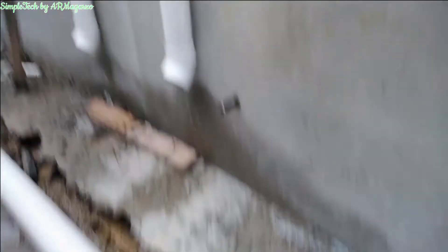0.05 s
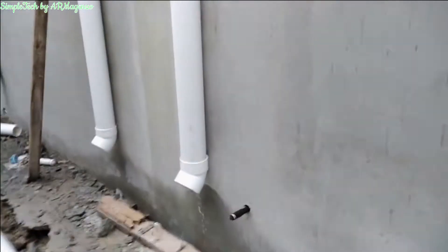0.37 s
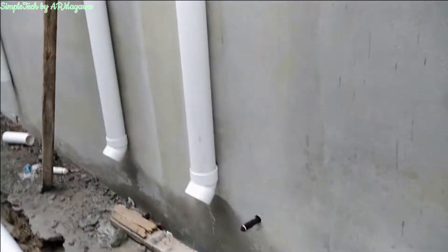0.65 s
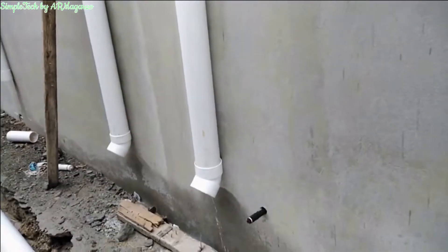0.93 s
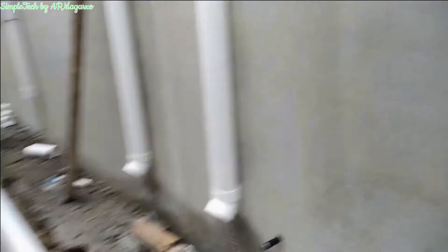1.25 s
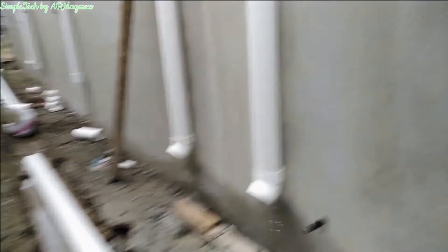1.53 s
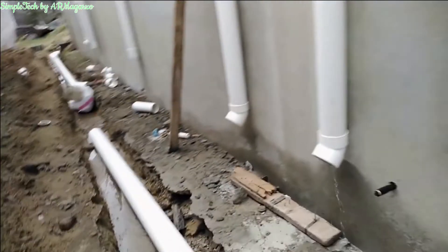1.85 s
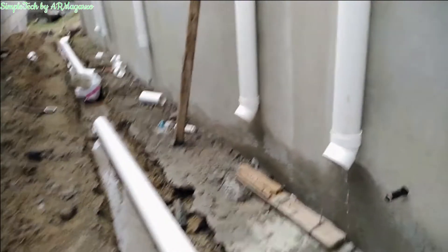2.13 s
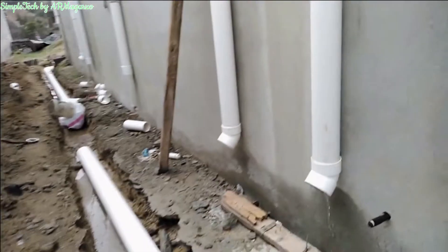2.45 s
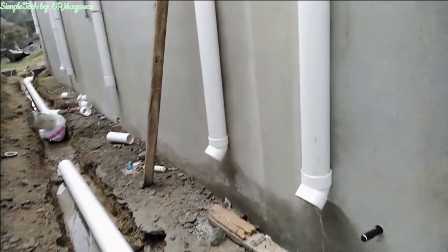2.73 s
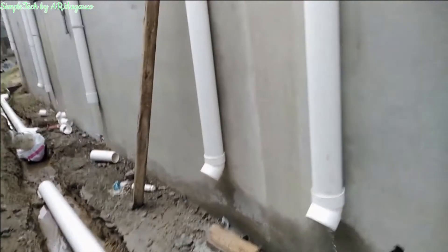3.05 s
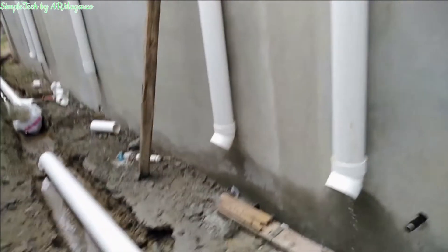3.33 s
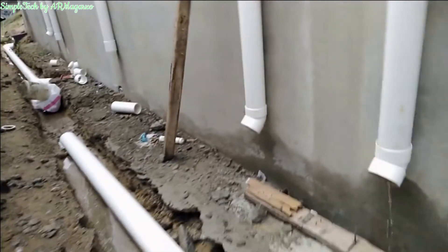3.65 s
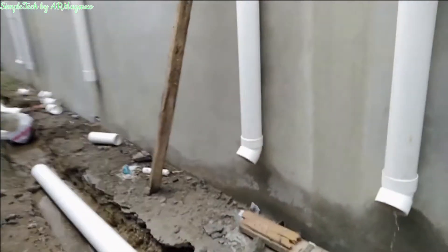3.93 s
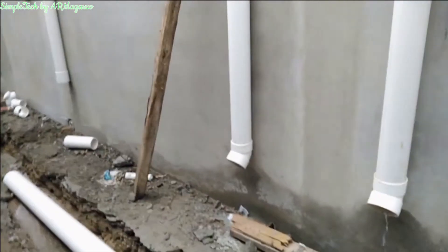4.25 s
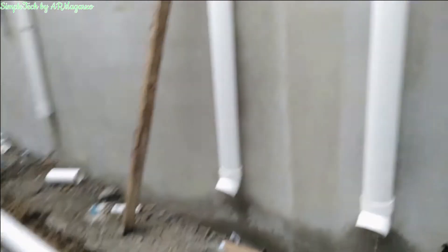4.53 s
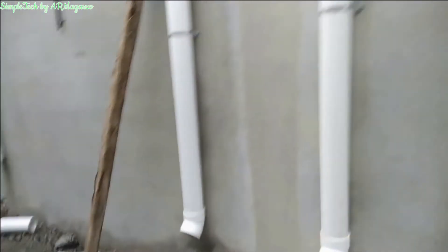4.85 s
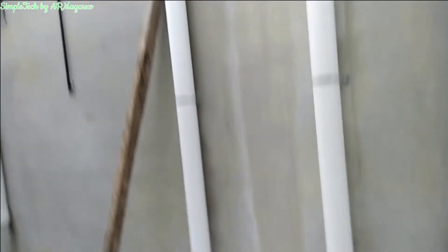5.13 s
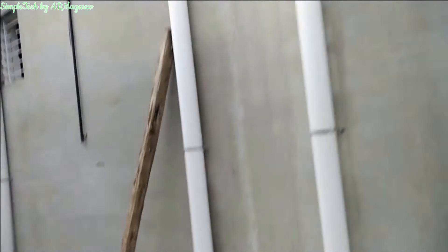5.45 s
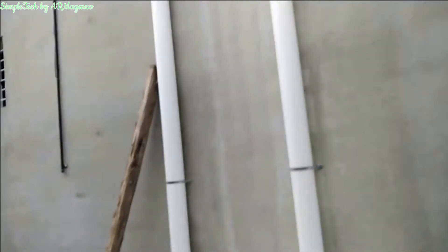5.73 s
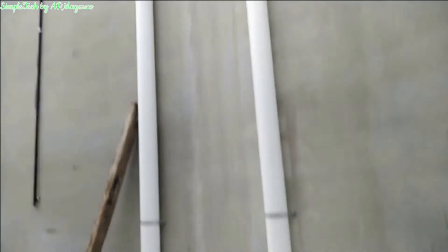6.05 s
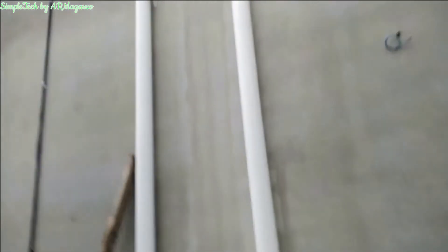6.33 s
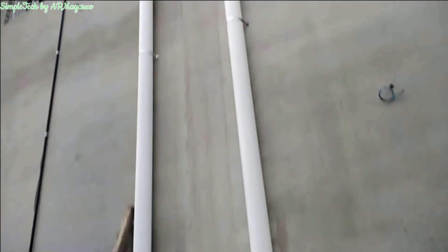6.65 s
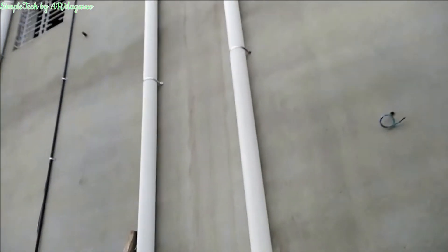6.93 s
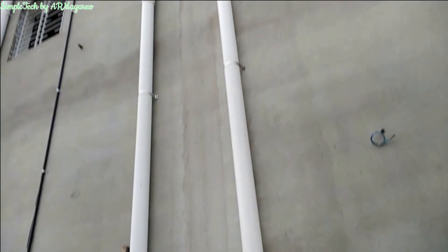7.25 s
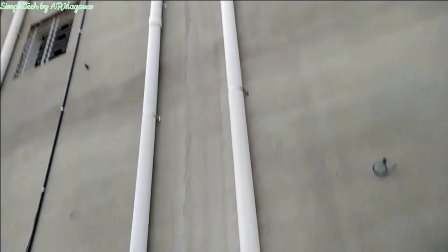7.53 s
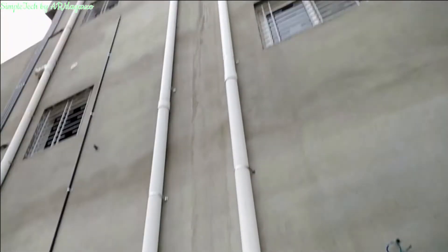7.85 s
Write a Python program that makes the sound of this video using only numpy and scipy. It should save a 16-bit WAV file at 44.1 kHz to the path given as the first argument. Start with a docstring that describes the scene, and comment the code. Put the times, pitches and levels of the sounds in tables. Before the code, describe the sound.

Rainwater drips from downpipes onto concrete and puddles close by, while soft steps scuff wet grit over a low rumble.

```python
"""Rainwater drips from downpipes onto wet concrete, mud and puddles, close to a hand-held camera.
Each drop is a damped ring with a wet crack: small ones tick, fat ones splat, dull ones plop, and trapped
bubbles sing. Behind them sit a fine spatter, steps scuffing wet grit, one heel thud, soft handling bumps
and a low rumble. The house wall gives each drop a short answer; the top end leans well to the left."""
import sys
import numpy as np
from scipy import signal
from scipy.fft import rfft, irfft, next_fast_len
from scipy.io import wavfile
from scipy.ndimage import uniform_filter1d, map_coordinates

SR = 44100
rng = np.random.default_rng(int(sys.argv[2]) if len(sys.argv) > 2 else 0)


def bounce(signal):
    """Save signal as a 16-bit WAV file at the path given by the first command-line argument."""
    frames = np.transpose(np.atleast_2d(signal))
    limited = np.clip(frames, -1, 1)
    pcm = np.round(limited * 32767).astype(np.int16)
    wavfile.write(sys.argv[1], SR, pcm)


N = 347508

# fader ride of the outdoor rumble: (time [s], level [dB])
RUMBLE_RIDE = [(0.0, -49), (2.43, -56.5), (3.03, -54), (3.95, -60), (4.21, -51.5), (4.87, -56.5),
               (5.48, -51), (5.66, -53), (6.7, -52.5), (7.4, -58.5)]
# rumble EQ: (frequency [Hz], gain [dB])
RUMBLE_EQ = [(38, -22.5), (62, -3), (100, 1), (230, 1.5), (330, -4), (450, -15.5), (700, -33.5),
             (1200, -41), (3000, -68)]
# hollow swells in the rumble: (crest time [s], level [dB], pitch [Hz], half length [s])
RUMBLE_SWELLS = [(5.282, -44.5, 277.5, 0.042), (5.478, -44.5, 265, 0.085), (6.485, -48, 256.5, 0.036),
                 (6.666, -49.5, 203.2, 0.14), (7.062, -46, 165, 0.1)]
# the hand knocking the camera: (time [s], level [dB], pitch [Hz])
HAND_BUMPS = [(2.816, -41, 102), (3.106, -35, 175), (3.124, -31, 263)]
# steps on wet grit: (time [s], crunch level [dB], spatter level [dB], rise [s], hold [s], fall [dB/s])
FOOTSTEPS = [(0.338, -57.5, -47, 0.14, 0.024, 115), (0.937, -64, -77, 0.098, 0.02, 152),
             (2.004, -57, -47.5, 0.014, 0.075, 99), (2.951, -55.5, -49, 0.0067, 0.06, 89),
             (3.935, -53.5, -47.5, 0.04, 0.26, 34.5), (4.564, -59.5, -53, 0.0077, 0.011, 149),
             (4.823, -56, -55, 0.03, 0.13, 27.5), (5.224, -61, -53, 0.08, 0.18, 109),
             (6.727, -68, -53, 0.026, 0.07, 113)]
# scrape lingering after a step: (time [s], level [dB], rise [s], hold [s], fall [dB/s])
SCRAPES = [(3.12, -61.5, 0.016, 0.1, 44)]
# the sole biting into grit: (time [s], level [dB])
HEEL_BITES = [(2.02, -46.5), (2.97, -43.5), (3.975, -45.5), (4.915, -48), (4.933, -44.5), (6.819, -49.5)]
# heel bite EQ: (frequency [Hz], gain [dB])
HEEL_EQ = [(250, -16), (550, -2), (2300, 0), (4000, -15), (12000, -35)]
# crushed grit EQ: (frequency [Hz], gain [dB])
GRIT_EQ = [(200, -20), (420, 3), (700, -27), (1100, -42), (1400, -6), (2100, 7), (3600, -2.5), (5000, 1),
           (7800, -1), (11000, -49)]
# squeezed mud EQ: (frequency [Hz], gain [dB])
MUD_EQ = [(250, -20), (600, 1.5), (1100, -4.5), (1800, 9.0), (3500, -15.5)]
# fader ride of the trickle, fainter once the camera tilts up the wall: (time [s], level [dB])
TRICKLE_RIDE = [(0, -56), (1.1, -59), (1.26, -66), (1.5, -57), (2.35, -60), (3.3, -57.5), (3.85, -53.5),
                (4.75, -62), (5.6, -57.5), (5.85, -66)]
# fine spatter EQ: (frequency [Hz], gain [dB])
SPATTER_EQ = [(1200, -36), (3800, -22.5), (5200, -19), (6400, -10), (7400, -7.5), (8200, -2.5),
              (9200, -10.5), (10300, -19.5), (14200, -27.5)]
# EQ of a drop's wet crack: (frequency [Hz], gain [dB])
CRACK_EQ = [(600, -60), (1300, -10.5), (2200, 6), (3700, -1), (5500, 1), (10500, 0), (14000, -6)]
# imbalance of the microphones: (frequency [Hz], left over right [dB])
MIC_BALANCE = [(500, 2), (1300, 12), (2400, 7.5), (4400, 1), (6200, -6), (8200, 12), (10000, 31)]
# bubbles trapped in a puddle: (time [s], level [dB], pitch [Hz])
PUDDLE_BUBBLES = [(0.76, -43.5, 1930), (1.42, -53, 2040), (1.6885, -45.5, 3700), (3.2834, -45.5, 1900),
                  (3.3622, -36.5, 1980), (3.472, -54, 1690), (3.5294, -51.5, 2370), (3.5626, -47.5, 1730),
                  (6.005, -52.5, 1830), (6.403, -53.5, 1860)]
# hollow plops, dull drips and one heel thud (the loudest): (time [s], relative level [dB], pitch [Hz])
HOLLOW_PLOPS = [(0.08, -42.5, 480), (0.381, -45, 604), (0.532, -45.5, 586), (1.512, -42, 626),
                (1.569, -50, 640), (2.009, -37, 516), (2.708, -48, 600), (2.737, -49.5, 600),
                (2.841, -47, 610), (3.285, -50.5, 630), (3.49, -50.5, 610), (4.645, -47, 507),
                (5.014, -43, 503), (5.121, -44, 506), (6.486, -54, 860), (6.925, -53, 554),
                (7.219, -49.5, 506), (7.382, -39.5, 516), (7.45, -47.5, 500), (7.609, -49, 501),
                (7.732, -44, 545)]
# fat drops that splat: (time [s], relative level [dB], pitch [Hz], relative crack level [dB])
FAT_DROPS = [(0.111, -31.5, 5650, -27), (0.2366, -42.5, 3340, -31), (0.579, -30, 2370, -15),
             (0.746, -37.5, 3360, -11), (0.8655, -36, 5360, -10), (0.977, -36.5, 4350, 0),
             (1.0797, -38, 4430, -20), (1.292, -45.5, 3300, -6), (2.0907, -25, 2260, -22),
             (2.5127, -34.5, 2370, -6), (2.582, -31, 5930, -13), (2.811, -36.5, 2880, -8),
             (3.284, -35, 4280, -12), (3.653, -39, 3460, -10), (3.7714, -31.5, 2440, -23),
             (4.5007, -23.5, 2990, -1.5), (4.8318, -31.5, 3710, -14), (5.954, -39, 2130, -17),
             (6.5903, -37, 2220, -4), (6.9316, -45, 2880, -4), (7.1243, -36, 2330, -32)]
# close small drops on hard ground: (time [s], relative level [dB], pitch [Hz], relative pan left [dB])
SMALL_DROPS = [(0.089, -23, 8270, 1), (0.11, -25.5, 7940, 10), (0.194, -33, 7600, 0),
               (0.6713, -22, 8220, 2), (0.867, -33.5, 8160, 8), (0.978, -31, 8100, 11),
               (1.045, -32.5, 9400, 10), (1.123, -36.5, 7800, 5), (1.2215, -35, 8350, 25),
               (1.3107, -34.5, 8270, 14), (1.3794, -34, 8200, 3), (1.4421, -29.5, 8600, 8),
               (1.6876, -30, 8600, 4), (1.756, -36.5, 10060, 10), (1.913, -39, 8450, 29),
               (2.0316, -32.5, 6850, -6), (2.252, -34.5, 8640, 16), (2.426, -41.5, 5940, -10),
               (2.5136, -26.5, 8300, -2), (2.58, -26, 8400, 12), (2.9052, -32.5, 7230, 15),
               (2.949, -35.5, 8850, 12), (3.3491, -26.5, 8400, 4), (3.397, -31.5, 8100, 3),
               (3.5235, -36.5, 8700, 4), (3.871, -31.5, 8750, 10), (4.135, -30.5, 6800, -8),
               (4.474, -34.5, 8400, 2), (4.8858, -36, 7300, -9), (4.9379, -30.5, 6950, -16),
               (6.066, -35.5, 9800, 11), (6.1883, -26, 9100, 16), (6.2688, -32, 8200, 12),
               (6.379, -35, 8740, 11), (6.5387, -30, 8460, 1), (6.675, -30, 8600, 6),
               (6.7363, -28.5, 8280, 9), (6.996, -33, 8940, 7), (7.3, -35.5, 8200, 28),
               (7.3246, -36.5, 6800, 4), (7.451, -38.5, 7840, 9), (7.796, -36.5, 8320, 22)]

BUBBLE_GLIDE = 0.011  # a bubble bends up in pitch as it surfaces


def amp(db):
    return 10 ** (np.asarray(db) / 20)


def unit(x):
    return x / np.sqrt(np.mean(x ** 2) + 1e-20)


def along(points, hz):
    """Read (frequency [Hz], value) points on a log axis."""
    freqs, values = np.transpose(points)
    return np.interp(np.log(hz + 1), np.log(freqs + 1), values)


def ride(points):
    """A fader level for every sample, from (time [s], level [dB]) points."""
    return np.interp(np.arange(N) / SR, *np.transpose(points))


def bursts(rows):
    """Power sum of envelopes: (time [s], level [dB], rise [s], hold [s], fall [dB/s])."""
    start, db, rise, hold, fall = np.transpose(rows)[:, :, None]
    t = np.arange(0, N, 64) / SR
    attack = np.clip((t - start) / rise, 0, 1)
    decay = amp(db - fall * np.maximum(t - start - rise - hold, 0))
    return np.interp(np.arange(N) / SR, t, np.linalg.norm(attack * decay, axis=0))


def wobble(rate):
    """Smooth random modulation, rate knots a second."""
    return map_coordinates(rng.standard_normal(int(N * rate / SR) + 4), [np.arange(N) * rate / SR])


def filtered(x, response):
    """Shape x with a frequency response."""
    n = x.shape[-1]
    padded = next_fast_len(n + 4096)
    return irfft(rfft(x, padded) * response(np.fft.rfftfreq(padded, 1 / SR)), padded)[..., :n]


def pan(left_db):
    """Left and right gains whose mean is 1."""
    gains = amp(np.array([left_db, -left_db]) / 2).reshape(2, -1)
    return gains / gains.mean(0)


def add(track, start, sound):
    """Mix a stereo sound in at start seconds."""
    i = int(np.clip(round(start * SR), 0, N - 1))
    track[:, i:i + sound.shape[1]] += sound[:, :N - i]


def noise(shared):
    """White stereo noise with a share common to both sides."""
    return np.sqrt(shared) * rng.standard_normal(N) + np.sqrt(1 - shared) * rng.standard_normal((2, N))


def grains(rate, spread_db, scatter_db):
    """Clicks of random timing, size and pan."""
    clicks = (rng.random(N) < rate / SR) * rng.choice([-1, 1], N)
    size = amp(spread_db * np.clip(rng.standard_normal(N), -2, 2))
    return unit(clicks * size * amp(scatter_db * rng.standard_normal((2, N))))


def coloured(x, eq):
    """Apply an EQ and the microphones' imbalance; the mid comes out at rms 1."""
    shaped = filtered(x, lambda hz: amp(along(eq, hz)) * pan(along(MIC_BALANCE, hz)))
    return shaped / np.std(shaped.mean(0))


def patchy(x, depth_db):
    """Shift the colour in small patches of time and pitch."""
    spectrum = signal.stft(x, nperseg=256)[2]
    patches = uniform_filter1d(rng.standard_normal(spectrum.shape[1:]), size=5, axis=0)
    patches = uniform_filter1d(patches, size=9, axis=1)
    return signal.istft(spectrum * amp(depth_db * unit(patches)), nperseg=256)[1][:, :N]


def ping(t, hz, rise, glide=0):
    """A heavily damped ring that peaks after rise seconds and may glide upwards."""
    age = np.maximum(t, 0) / rise
    return age ** 2 * np.exp(2 - 2 * age) * np.sin(2 * np.pi * hz * t * (1 + glide * age))


def wall(sound, near_db, far_db):
    """Spread a sound to stereo with quick scatter off the ground and a longer answer from the wall."""
    t = np.arange(SR // 4) / SR
    response = np.zeros((2, len(t)))
    for db, t60 in [(near_db, .035), (far_db, .21)]:
        tail = rng.standard_normal(response.shape) * amp(-60 * t / t60) * (1 - np.exp(-t / 0.0053))
        response += amp(db) * tail / np.linalg.norm(tail[0])
    response[:, 0] += 1
    return signal.fftconvolve(sound[None], response, axes=1)


def ground_echo(x, echo_db=-6.5, delay_s=.0021, drift=0.203):
    """The bounce off the ground combs the sound; its delay drifts as the camera moves."""
    delay = delay_s * SR * np.exp(drift * wobble(2))
    echo = np.array([map_coordinates(side, [np.arange(N) - delay]) for side in x])
    return (x + amp(echo_db) * echo) / np.hypot(1, amp(echo_db))


def tilt_away(x, start_s=4.86, loss_db_per_s=3.143, edge_hz=10800):
    """The top end fades as the microphones tilt up, away from the ground."""
    top = filtered(x, lambda hz: 1 - 1 / (1 + (hz / edge_hz) ** 20))
    elapsed = np.maximum(np.arange(N) / SR - start_s, 0)
    return x - top * (1 - amp(-loss_db_per_s * elapsed))


def shower(rate, centre_hz, octaves, cycles, spread_db):
    """A cloud of distant pings of random timing, pitch and size, at rms 1."""
    when, pitch, size = rng.random((max(1, int(rate * N / SR)), 3)).T[:, :, None]
    hz = centre_hz * 2 ** (octaves * (2 * pitch - 1))
    offsets = np.arange(SR // 40)
    pings = amp(spread_db * size ** 2) * ping(offsets / SR, hz, cycles / hz)
    positions = (when * N).astype(int) + offsets
    mono = np.bincount(positions.ravel(), pings.ravel(), N)[:N]
    return unit(wall(mono, near_db=-2, far_db=-5)[:, :N])


def rumble():
    """A low, uneven outdoor bed with narrow, hollow swells rising and falling in it."""
    t = np.arange(N) / SR
    out = amp(ride(RUMBLE_RIDE) + 2.28 * wobble(25)) * coloured(noise(shared=0.87), RUMBLE_EQ)
    waver = unit(wobble(80)) + 1j * unit(wobble(80))
    for crest, db, hz, half_length in RUMBLE_SWELLS:
        swell = np.exp(-((t - crest) / half_length) ** 2)
        band = (waver * np.exp(2j * np.pi * hz * t)).real
        out += amp(db) * pan(3.5) * swell * band
    return out


def bumps():
    """The hand knocks softly on the camera's body."""
    out, t = np.zeros((2, N)), np.arange(SR // 8) / SR
    for start, db, hz in HAND_BUMPS:
        add(out, start, amp(db) * pan(2.5) * ping(t, hz, rise=0.0057))
    return out


def scrape():
    """A faint, broken scrape: stones rub and ring in one narrow band."""
    return bursts(SCRAPES) * pan(7) * shower(rate=140, centre_hz=1800, octaves=.2, cycles=4, spread_db=8)


def heels(rise_s=.0015, hold_s=0.0042, fall_db_per_s=650):
    """Grit breaks under the sole in a sudden clump of coarse grains."""
    press = bursts([(start, db, rise_s, hold_s, fall_db_per_s) for start, db in HEEL_BITES])
    return press * coloured(grains(rate=1800, spread_db=0.5, scatter_db=2.5), HEEL_EQ)


def grit(firm_step_db=-51, scatter_rise_s=0.00025, scatter_fall_db_per_s=125):
    """Wet grit crunches under steps, scatters from each splat and patters dully under the trickle."""
    steps = [(start, db, rise, hold, fall) for start, db, _, rise, hold, fall in FOOTSTEPS]
    scatter = [(start, db - 34.5, scatter_rise_s, 0, scatter_fall_db_per_s)
               for start, db, *_ in FAT_DROPS]
    patter = amp(ride(TRICKLE_RIDE) - 21)
    scuff_db = 20 * np.log10(np.hypot(bursts(steps + scatter), patter))
    crunch = noise(shared=.35) + amp(-2) * grains(rate=300, spread_db=5, scatter_db=3)
    crunch = patchy(crunch, depth_db=2.5)
    crumble = amp(2.4 * wobble(70))
    # a firm step squeezes the mud: the squelch grows faster than the crunch
    squelch = amp(-6 + 0.52 * (scuff_db - firm_step_db)) * coloured(crunch, MUD_EQ)
    stones = amp(-9) * pan(8) * shower(rate=190, centre_hz=1300, octaves=1.1, cycles=1.6, spread_db=8)
    return amp(scuff_db + 2.5) * crumble * (coloured(crunch, GRIT_EQ) + squelch + stones)


def spray_envelope(typical_tick_db=-28, rise_s=0.00025, hold_s=0.017, fall_db_per_s=216):
    """Steps and ticks throw up spray over the steady trickle; louder ticks throw more."""
    # a step's spray dies faster than its crunch
    steps = [(start, db, rise, hold, 1.2 * fall) for start, _, db, rise, hold, fall in FOOTSTEPS]
    thrown = [(start, -53 + 0.46 * (db - typical_tick_db), rise_s, hold_s, fall_db_per_s)
              for start, db, *_ in SMALL_DROPS]
    return np.hypot(bursts(steps + thrown), amp(ride(TRICKLE_RIDE)))


def spatter():
    """Countless droplets merge into a fluttering hiss, with single pings poking through."""
    fizz = noise(shared=.5) + amp(-4) * grains(rate=400, spread_db=5, scatter_db=3)
    fizz = patchy(fizz, depth_db=3.5)
    flutter = amp(4.5 * wobble(55))
    hiss = amp(1) * flutter * coloured(fizz, SPATTER_EQ)
    droplets = pan(5.5) * shower(rate=50, centre_hz=8090, octaves=0.35, cycles=2.13, spread_db=14.5)
    taps = shower(rate=16, centre_hz=3100, octaves=0.9, cycles=4.5, spread_db=12)
    prickle = pan(11.5) * shower(rate=21, centre_hz=11800, octaves=0.16, cycles=3.3, spread_db=16)
    return spray_envelope() * (hiss + amp(-2.5) * droplets + amp(-15) * taps + amp(-12) * prickle)


def bubbles():
    """Bubbles trapped in a puddle ring with a round, slightly rising note."""
    out, t = np.zeros((2, N)), np.arange(SR // 20) / SR
    for start, db, hz in PUDDLE_BUBBLES:
        note = ping(t, hz, rise=0.0017, glide=BUBBLE_GLIDE)
        add(out, start, amp(db) * pan(along(MIC_BALANCE, hz)) * wall(note, near_db=-2.5, far_db=-6.5))
    return out


def crack(t, hz, cavity_db=2, cavity_octaves=0.2):
    """A wet snap of noise; the drop's cavity favours the band around its own pitch."""
    envelope = np.minimum(t / .0006, 1) * (amp(-60 * t / .011) + amp(-20 - 60 * t / .06))
    burst = rng.standard_normal(len(t)) * envelope
    cavity = lambda f: cavity_db * (np.exp(-(np.log2((f + 1) / hz) / cavity_octaves) ** 2) - 1)
    return filtered(burst, lambda f: amp(along(CRACK_EQ, f) + cavity(f)))


def drop(hz, rise, crack_db, bounce_db, bounce_s, octaves, glide=0):
    """One impact of peak 1: a ping, a crack and three droplets falling back, detuned by up to octaves."""
    t = np.arange(SR // 20) / SR
    hit = ping(t, hz, rise, glide)
    for late, detune, size in rng.random((3, 3)):
        droplet = ping(t - 2 * rise - late * bounce_s, hz * 2 ** (octaves * detune), rise, glide)
        hit += amp(bounce_db) * size * droplet
    hit += amp(crack_db) * crack(t, hz)
    return hit / np.abs(hit).max()


def cluster(hz, rise, span_s, count=12):
    """Tiny droplets land around a drop, thinning out and fading over the span."""
    t = np.arange(SR // 16) / SR
    late, detune, size = rng.random((count, 3)).T[:, :, None]
    pings = ping(t - late ** 2 * span_s, hz * 1.396 ** (2 * detune - 1), rise)
    return (amp(-8 * size - 10 * late) * pings).sum(0)


def plops():
    """Hollow plops that ring for a few cycles: dull drips and one heel thud."""
    out = np.zeros((2, N))
    for start, db, hz in HOLLOW_PLOPS:
        hit = drop(hz, rise=0.003, crack_db=-26, bounce_db=-11.5, bounce_s=0.0121, octaves=0.22)
        add(out, start, amp(db - 2.5) * pan(2) * wall(hit, near_db=-24, far_db=-4.5))
    return out


def splats():
    """Fat drops slap with a short crack, ring below the ticks and leave a tail of droplets."""
    out = np.zeros((2, N))
    for start, db, hz, crack_db in FAT_DROPS:
        hit = drop(hz, rise=0.0007, crack_db=crack_db + 13, bounce_db=-6, bounce_s=0.006,
                   octaves=0.53, glide=BUBBLE_GLIDE)
        splash = amp(-16.5) * cluster(hz, rise=0.0013, span_s=0.037)
        splash[:len(hit)] += hit
        heard = wall(splash, near_db=-13.5, far_db=-10)
        add(out, start, amp(db + 4) * pan(along(MIC_BALANCE, hz) + 5.5) * heard)
    return out


def ticks(lead_s=.004, trail_s=.022):
    """Small drops burst with a tight, high ring; droplets land just before and after."""
    out = np.zeros((2, N))
    for start, db, hz, pan_db in SMALL_DROPS:
        hit = drop(hz, rise=0.00047, crack_db=-25, bounce_db=-9.5, bounce_s=0.0084, octaves=-0.33)
        splash = amp(-13) * cluster(hz, rise=0.0004, span_s=lead_s + trail_s)
        splash[round(lead_s * SR):][:len(hit)] += hit
        heard = wall(splash, near_db=-14, far_db=-17)
        add(out, start - lead_s, amp(db + 5) * pan(pan_db + 6) * heard)
    return out


def scene(left_lead_s=.00015):
    """The mix: water and steps reach the left microphone first, over the bumps and the rumble."""
    ground = ground_echo(ticks() + splats() + spatter() + grit() + heels())
    foreground = tilt_away(ground + bubbles() + plops() + scrape())
    placed = filtered(foreground, lambda hz: np.exp(1j * np.pi * hz * left_lead_s * np.array([[1], [-1]])))
    return placed + bumps() + rumble()


def record(dry, top_hz=14700):
    """The camera's band limit is a brick-wall high cut."""
    return filtered(dry, lambda hz: 1 / np.sqrt(1 + (hz / top_hz) ** 120))


dry = scene()
out = record(dry)
bounce(out)
```